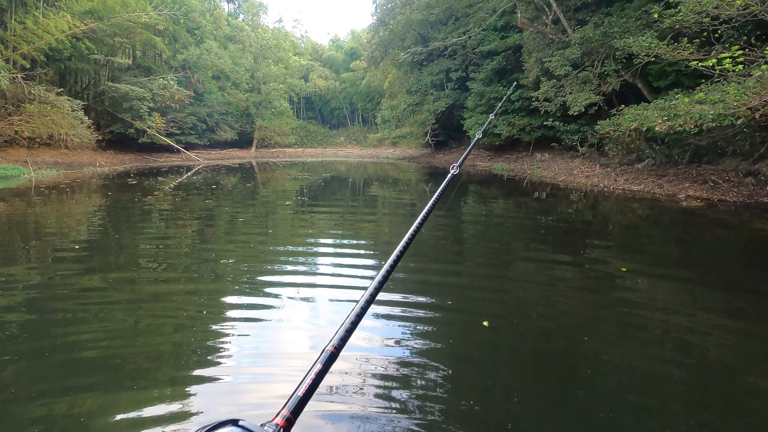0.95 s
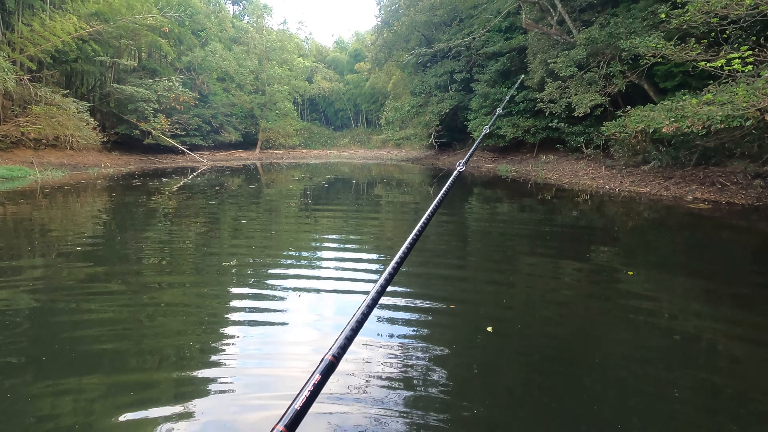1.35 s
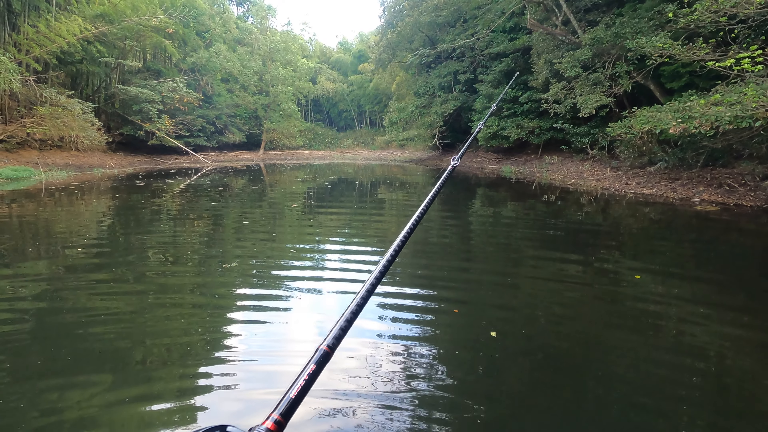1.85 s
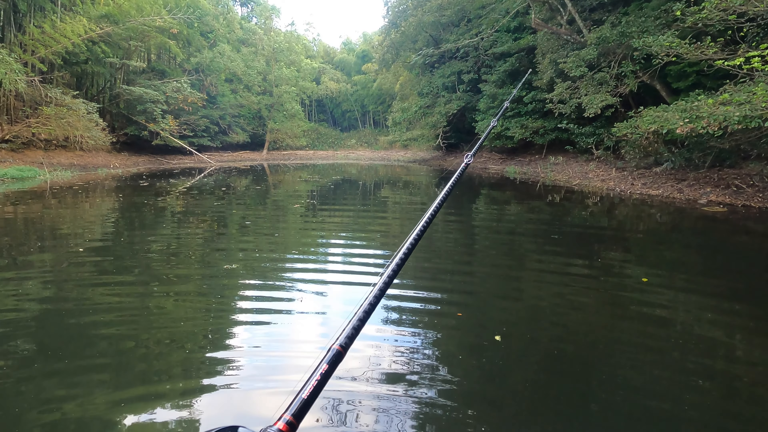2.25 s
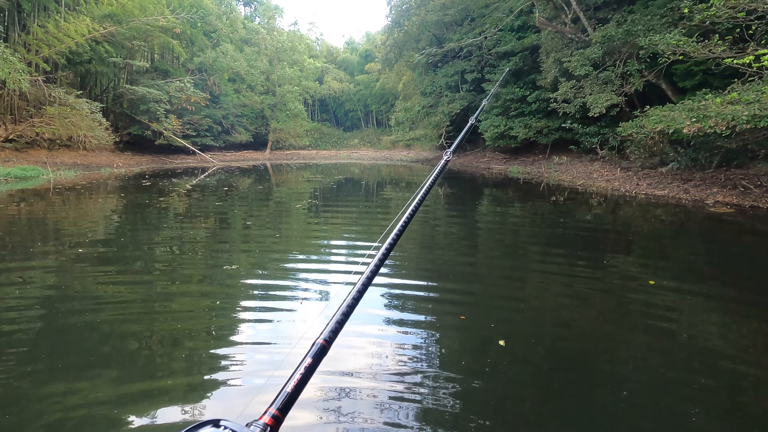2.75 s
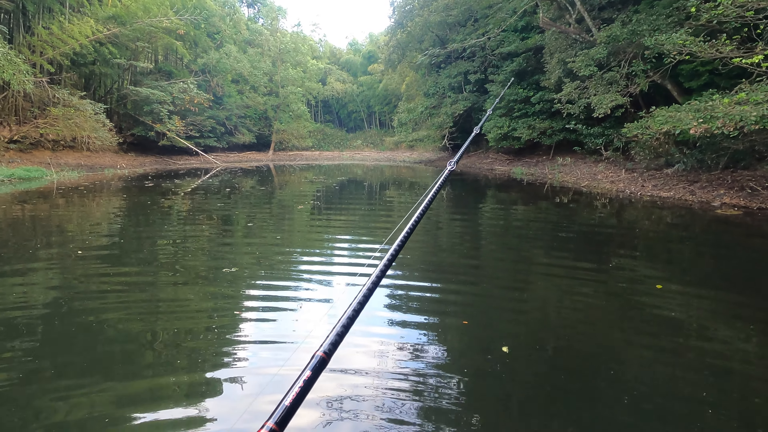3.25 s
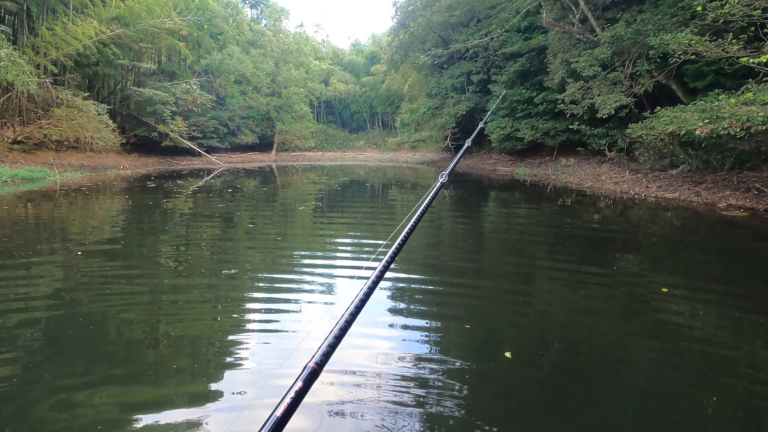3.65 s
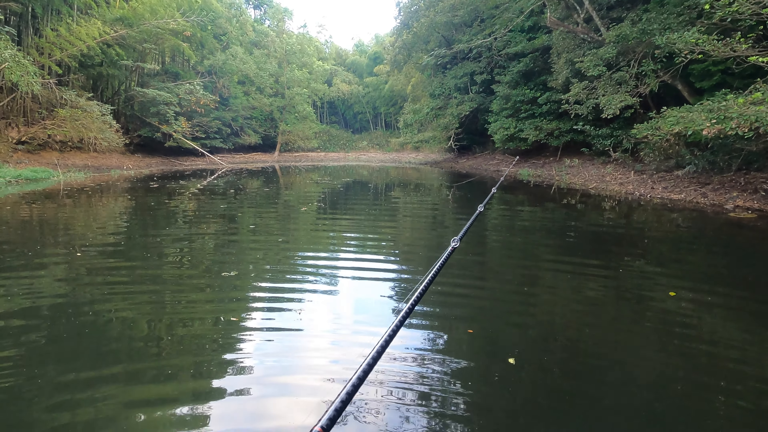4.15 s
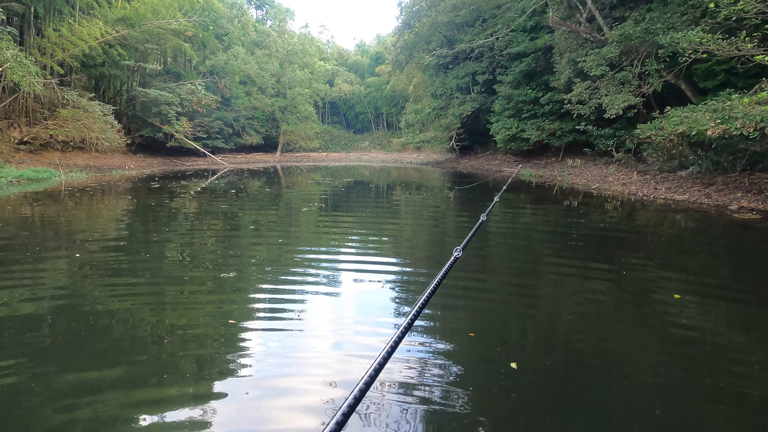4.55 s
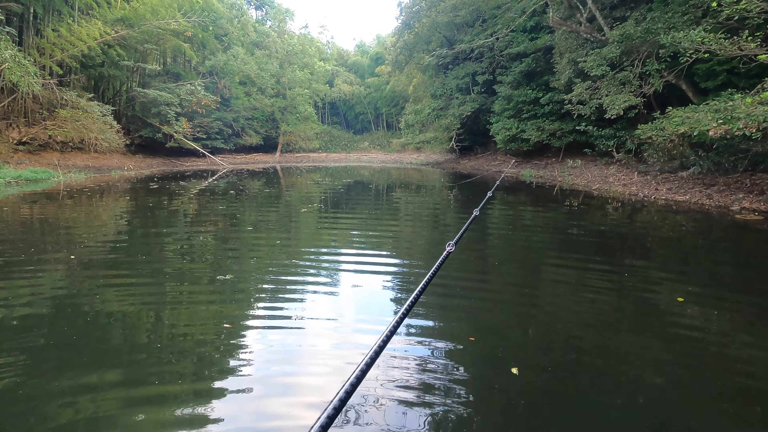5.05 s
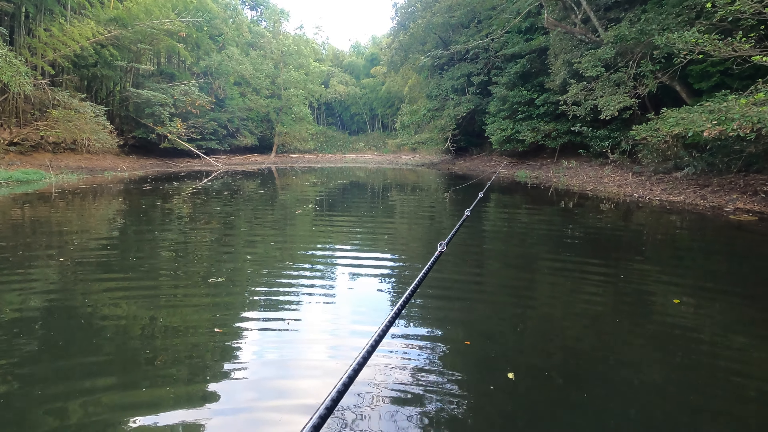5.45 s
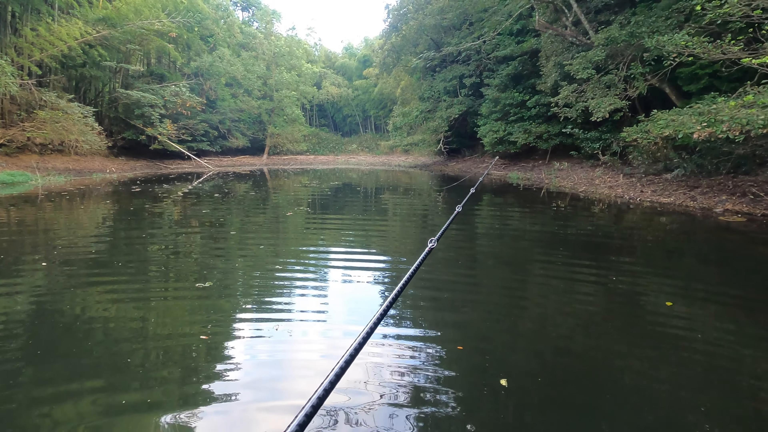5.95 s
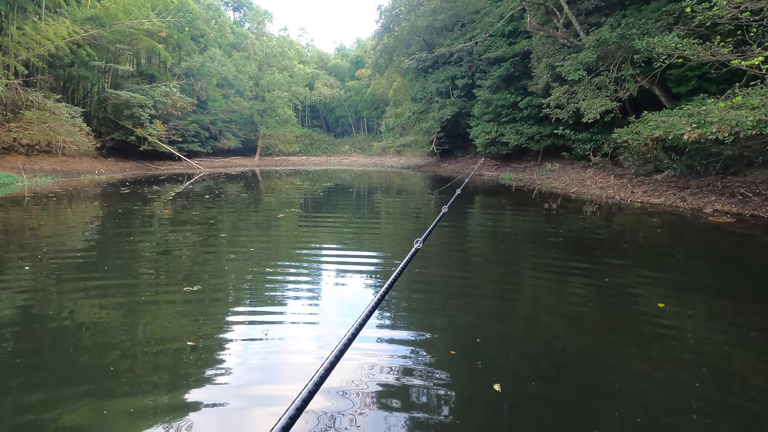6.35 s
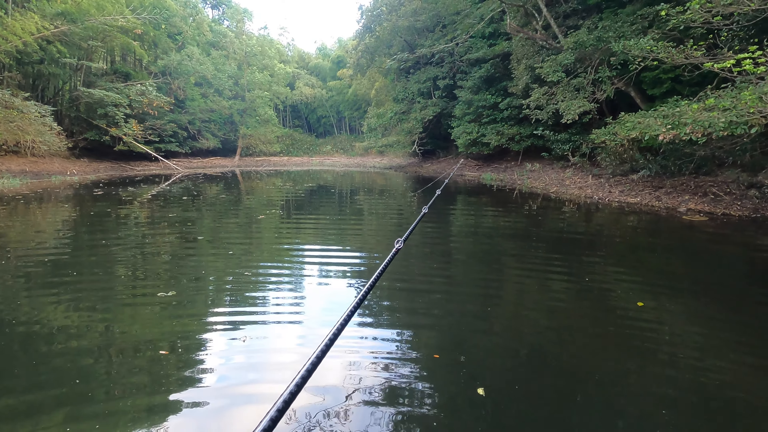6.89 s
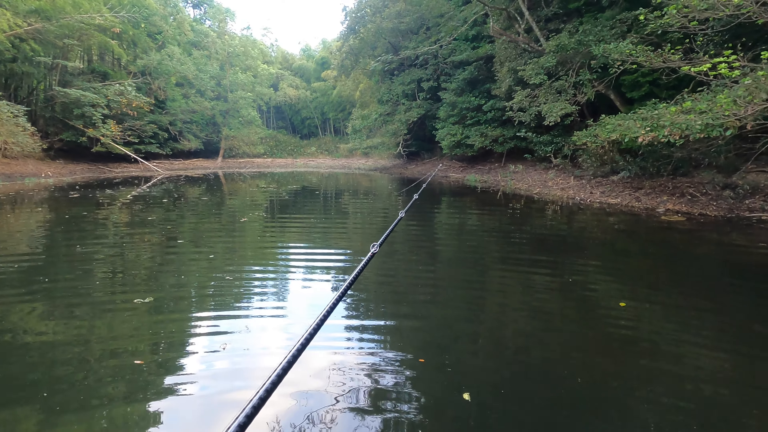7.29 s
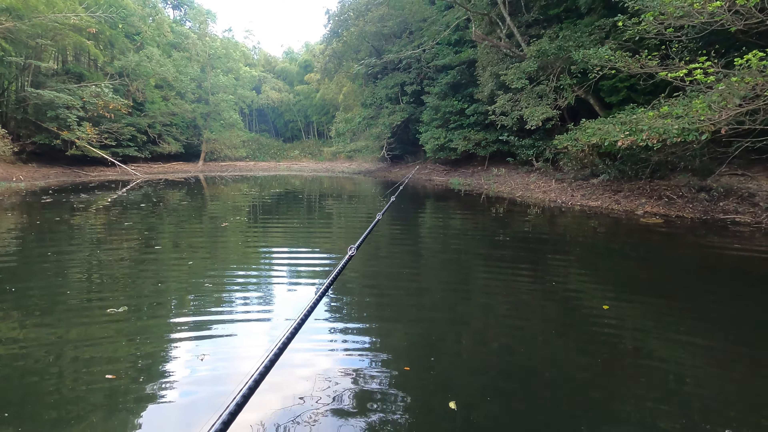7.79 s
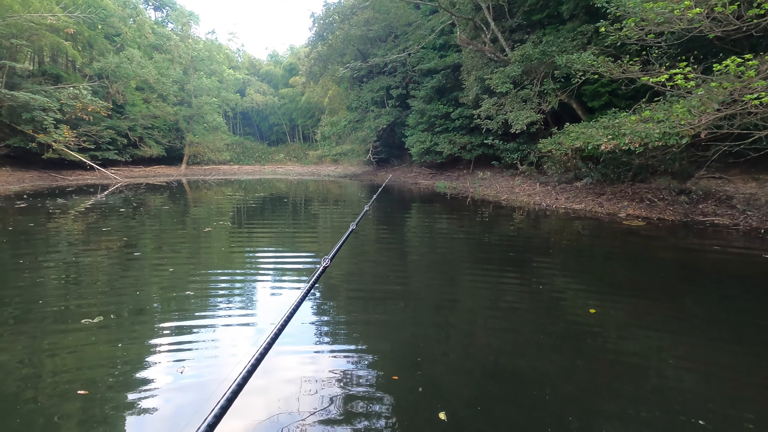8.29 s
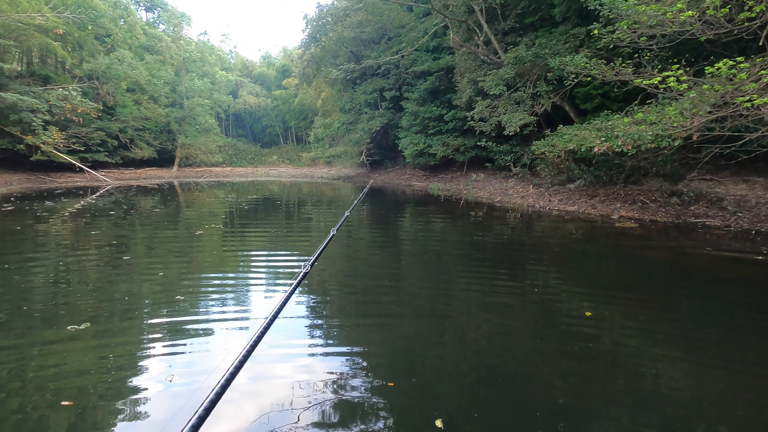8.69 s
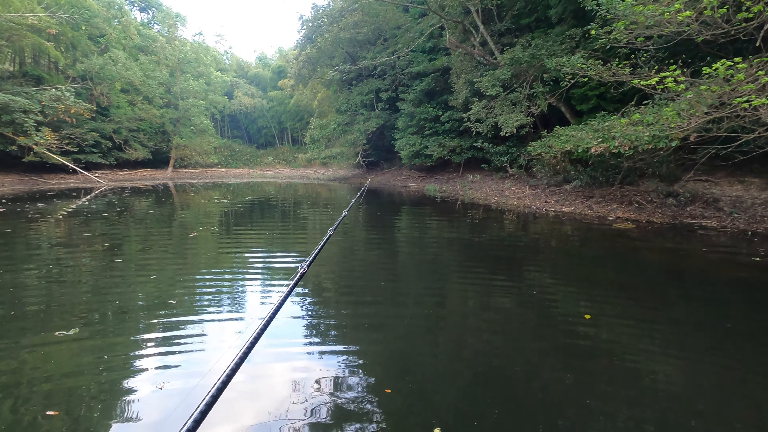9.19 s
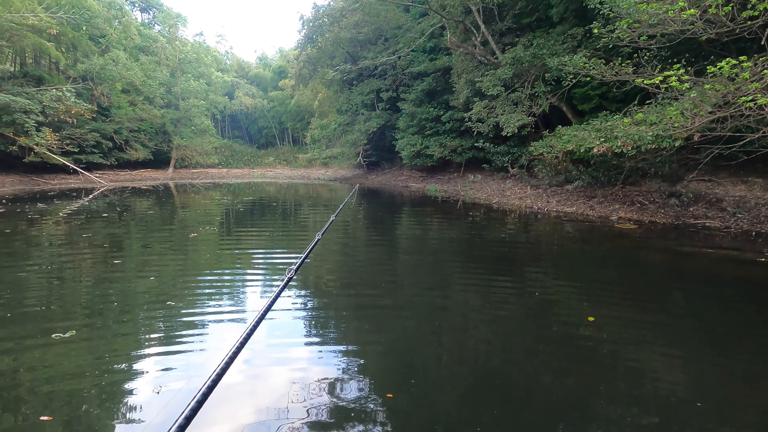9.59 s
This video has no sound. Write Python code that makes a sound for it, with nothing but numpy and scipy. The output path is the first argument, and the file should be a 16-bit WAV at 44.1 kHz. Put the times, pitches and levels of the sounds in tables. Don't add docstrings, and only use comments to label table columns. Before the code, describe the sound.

A still pond among trees, heard from a small boat with a near stereo microphone. A dry double metal snap dominates the opening; everything after is far softer. Fine gear ticks come unevenly, a lure lip clinks now and then, and a steady throbbing insect drone lies under echoing birdsong and nearer falling chips. From past the middle the seat creaks in quick slips and dull thuds bump the hull, with faint breeze rumble, before it calms again.

```python
import sys
import numpy as np
from scipy import signal
from scipy.fft import rfft, irfft
from scipy.io import wavfile
from scipy.ndimage import uniform_filter1d

SR = 44100
rng = np.random.default_rng(int(sys.argv[2]) if len(sys.argv) > 2 else 0)


def to_linear_factor(level_db):
    exponent = np.asarray(level_db, float) / 20
    return 10 ** exponent


def wav_record(signal):
    frames = np.transpose(np.atleast_2d(signal))
    bounded = np.clip(frames, -1, 1)
    quanta = np.round(bounded * 32767).astype(np.int16)
    wavfile.write(sys.argv[1], SR, quanta)


N = 433503
T = np.arange(N) / SR

# (time [s], peak [dB], centre [Hz], t60 [s])
CLUTCH_SNAPS = [(.2035, -46, 3000, .01), (.2225, -31, 4000, .012), (.2238, -13.5, 5500, .009),
                (.2272, -28, 4800, .014), (.231, -27, 5500, .009), (.2322, -11.5, 6300, .01),
                (.2372, -26, 4500, .012), (.2388, -3, 5200, .007), (.24, -5, 5600, .008),
                (.2414, -15, 5200, .008), (.2435, -18, 5000, .01), (.2465, -30, 4000, .02)]
# (frequency [Hz], level [dB], t60 [s])
HOUSING_MODES = [(650, -20, .02), (945, -34, .15), (1010, -22, .04), (1147, -16, .045), (1290, -7, .016),
                 (818, -36, .13), (1590, -14, .02), (1950, -6, .011), (2160, -19, .04), (2450, 0, .012),
                 (500, -24, .025), (4650, 4, .008), (5800, 9, .008), (6700, 7, .008), (7800, -6, .006)]
# (time [s], peak [dB], centre [Hz])
HANDLE_KNOCKS = [(.012, -46.5, 2800), (0.045, -55, 7000), (0.066, -40.5, 4440), (0.167, -42, 3780),
                 (.521, -55, 3030), (0.6025, -37.5, 5070), (0.604, -42.5, 1100), (0.833, -48, 4960),
                 (.908, -58, 6960), (1.2662, -52.5, 2826), (1.447, -55, 5500), (1.786, -55, 1779),
                 (8.351, -53, 5500), (2.201, -50.5, 2400), (2.756, -52, 2540), (3.17, -55, 4000),
                 (4.158, -52, 4960), (5.249, -46.5, 4500), (5.449, -45, 5000), (6.397, -50.5, 4970),
                 (8.766, -46, 4500), (9.074, -59, 4800)]
# (time [s], bright ring peak [dB], dull ring re bright [dB])
GEAR_TICKS = [(1.267, -56, 12), (2.2521, -53.5, 3), (2.4416, -52, -5), (2.4972, -42, -5.5),
              (2.543, -48, -13), (2.755, -48.5, -5), (2.8694, -54.5, -7.5), (2.9098, -52, -13),
              (3.163, -54, -9.5), (3.2626, -51.5, -16), (3.8737, -59, -12), (4.0423, -41, -1),
              (4.1588, -44.5, -3), (4.5854, -56.5, -6), (4.6225, -54, -9.5), (5.0473, -51.5, -8),
              (5.0798, -47, -5), (5.2024, -48.5, -2), (5.356, -48, -1), (5.385, -46, 7), (5.402, -52, 2),
              (5.807, -51, 4.5), (6.869, -56.5, 11.5), (7.4743, -59, 1), (8.351, -44, 1.5),
              (8.686, -55.5, -24), (9.127, -56, -7.5), (9.728, -48, -18)]
# (time [s], bright ring peak [dB], dull ring re bright [dB])
GUIDE_TICKS = [(1.227, -59, 10), (1.3616, -49.5, -1), (1.7804, -59, 1.5), (2.8957, -60, -6),
               (2.946, -56, -8), (3.217, -59, -15), (4.2531, -56, -9), (4.3703, -52.5, -13),
               (6.275, -56, -2), (6.691, -53.5, -6), (7.3112, -63, 7), (7.6155, -59, -1), (7.784, -56, 0),
               (7.982, -51, -5), (8.055, -52, 3), (8.449, -53.5, 0.5), (8.5557, -48.5, -3),
               (8.765, -53, -12), (8.837, -55, -3), (8.958, -56, -17), (9.427, -53, -3),
               (9.551, -57, -13.5), (9.5896, -57, -18)]
# (time [s], peak [dB])
FAINT_TICKS = [(.586, -72), (.652, -67), (1.0814, -64), (1.29, -66), (1.526, -67), (1.5994, -76),
               (1.7104, -70), (1.723, -69), (1.7864, -68.5), (2.107, -63), (2.3024, -69), (2.5804, -65),
               (2.613, -62), (2.9274, -64), (3.4506, -66), (3.474, -61), (3.8417, -67.5), (3.903, -61),
               (3.983, -69), (4.0637, -61), (4.2324, -70), (4.6944, -67), (4.849, -57), (5.0854, -62),
               (5.1764, -72), (5.1886, -68), (5.334, -57), (5.503, -61), (5.7813, -65.5), (6.009, -68),
               (6.3374, -66), (6.4144, -68), (6.475, -63), (6.523, -64), (6.668, -64), (7.0634, -67.5),
               (7.2684, -69.5), (7.3228, -60.5), (7.5358, -64), (7.6755, -65), (7.7388, -66), (7.9583, -71),
               (8.3396, -65), (8.54, -58.5), (8.9914, -64), (9.112, -68), (9.1864, -74), (9.2025, -62),
               (9.366, -64), (9.5766, -64), (9.6794, -68), (9.7512, -61.5)]
# (frequency [Hz], lead [rad])
PORT_LEAD = [(400, 0), (950, .6), (2300, 1), (4500, .15), (8700, .6), (9500, -.6), (11500, .2),
             (13000, 1.2)]
# (time [s], peak [dB], frequency [Hz])
LURE_CLINKS = [(1.5968, -53.5, 2040), (2.5531, -55.5, 1950), (2.6055, -59, 1960), (2.6497, -42, 2036),
               (3.214, -49, 2170), (4.0442, -57, 1720), (4.316, -47, 2370), (4.64, -54, 2640),
               (5.8587, -44, 2210), (6.5171, -54, 2300), (6.9858, -53.5, 2330), (7.0404, -52, 2150),
               (7.3888, -44.5, 2010), (8.7375, -62, 1610), (9.245, -43, 2040)]
# (time [s], peak [dB], frequency [Hz])
HULL_THUDS = [(0.24, -44.5, 163), (3.163, -57, 178), (3.92, -40, 148), (5.714, -47, 168), (5.906, -40, 191),
              (6.589, -33.5, 209), (6.641, -38, 190), (6.966, -35.5, 191), (7.018, -38.5, 180),
              (7.087, -38.5, 182), (7.488, -47.5, 207), (7.518, -49, 238), (7.558, -46, 210),
              (7.597, -35, 202), (7.657, -47.5, 202), (7.915, -46, 197), (8.006, -43.5, 172),
              (8.078, -40.5, 176)]
# (time [s], peak [dB])
SEAT_SLIPS = [(5.687, -55), (5.719, -49), (5.738, -52), (5.755, -49), (5.799, -49), (5.838, -54),
              (5.873, -44.5), (5.893, -45.5), (5.929, -48.5), (5.949, -53), (6.008, -59), (6.046, -52.5),
              (6.135, -53), (6.416, -45), (6.441, -46.5), (6.468, -46.5), (6.495, -51.5), (6.517, -45),
              (6.535, -46), (6.774, -52.5), (6.891, -52.5), (6.931, -54.5)]
# (length [s], start [Hz], bend [Hz], end [Hz], level re full note [dB])
SONG_NOTES = [
    (.12, 8180, 8300, 8300, -19),
    (.07, 7100, 7640, 7220, -11),
]
# (thin note time [s], hooked note time [s], level [dB])
SONGS = [
    (.463, .625, -63),
    (.95, 1.14, -63),
    (2.054, 2.21, -60),
    (3.913, 4.06, -58.5),
    (5.41, 5.538, -59.5),
    (7.45, 7.575, -62),
]
# (time [s], level [dB])
THIN_NOTES = [
    (.01, -77.5),
    (7.882, -76),
    (8.374, -78),
    (9.76, -75.5),
]
# (time [s], climb [s], start [Hz], top [Hz], held [Hz], climb [dB], hold [dB])
FULL_NOTES = [
    (.724, .036, 4900, 5950, 5430, -63, -63),
    (1.25, .026, 5050, 5950, 5350, -64, -66),
    (2.328, .048, 5580, 6020, 5660, -59, -67),
    (4.186, .036, 5300, 5820, 5360, -57, -67),
    (5.668, .03, 5170, 5580, 5200, -58, -65),
    (7.696, .04, 5280, 5900, 5420, -61, -62),
]
# (time [s], length [s], start [Hz], held [Hz], level [dB])
SLURRED_CALLS = [
    (5.459, 0.0724, 4150, 3950, -53.5),
    (5.56, .085, 3950, 4030, -58.5),
    (5.804, 0.12, 6900, 6900, -64),
    (5.926, .1, 1297, 1285, -62),
    (5.945, .078, 5550, 5570, -66),
    (8.16, 0.09, 5460, 5450, -57),
    (8.764, 0.021, 9000, 8550, -69),
]
# (time [s], length [s], start [Hz], middle [Hz],
# end [Hz], level [dB])
BENT_CALLS = [(6.515, .07, 5150, 5180, 5100, -60), (6.6, .12, 5000, 5130, 5100, -66),
              (6.492, .07, 5150, 4600, 4300, -59), (6.53, .054, 2620, 2400, 2350, -67),
              (8.222, .11, 4200, 4450, 4750, -61), (8.296, .02, 4000, 3400, 2600, -67),
              (8.324, .16, 2400, 2390, 2391, -71), (5.49, .12, 3800, 3310, 2950, -68),
              (8.045, .02, 6940, 7200, 7400, -62), (8.07, .05, 7050, 7600, 6700, -62),
              (1.118, .06, 7150, 6950, 7150, -66), (5.9, .12, 2400, 4020, 4640, -67)]
# (time [s], length [s], start [Hz], end [Hz], level [dB])
SLIDES = [
    (6.416, .084, 3250, 5220, -59),
    (6.42, .025, 3250, 2650, -63),
    (6.648, .04, 3450, 2400, -60),
    (5.422, .022, 1900, 5300, -64),
    (2.603, .014, 2950, 3500, -61),
    (3.16, .025, 4300, 3500, -61),
    (6.73, .03, 4600, 5900, -67),
]
# (time [s], length [s], low edge [Hz], high edge [Hz], level [dB])
RASPS = [(0.135, 0.085, 6800, 7700, -67), (0.551, 1.32, 746, 943, -75), (5.439, 0.37, 2780, 4400, -63),
         (5.429, 0.59, 4840, 7140, -67.5), (5.851, 0.33, 3340, 5200, -61.5), (5.859, 2.15, 1201, 1310, -72),
         (6.201, 0.25, 5450, 6920, -72), (6.461, 0.27, 3450, 5000, -62.5), (6.499, 0.55, 1980, 3350, -73),
         (6.721, 0.25, 4800, 7200, -69.5), (7.456, 2.4, 1127, 1333, -74.5), (8.191, 0.51, 3480, 4830, -63)]
# (time [s], peak [dB], start [Hz])
CHIPS = [(0.146, -63, 3800), (0.972, -67, 3700), (1.044, -59, 4000), (1.603, -65.5, 3600),
         (1.6894, -59, 3790), (2.045, -60, 3770), (2.588, -58.5, 3600), (2.664, -53.5, 3950),
         (4.376, -58, 3500), (4.433, -50.5, 4200), (4.597, -55.5, 3950), (4.771, -55.5, 3850),
         (5.1377, -65, 3800), (6.728, -57, 4000), (7.3597, -60, 3800), (7.598, -63, 3450),
         (7.757, -59, 3460), (7.885, -57, 3800), (9.288, -62, 3340), (9.7956, -58, 3840)]
# (centre [Hz], width [Hz], level [dB], throb rate [Hz], throb depth [dB])
INSECT_CHOIRS = [
    (4500, 300, -68.5, 15.8, 3),
    (4120, 730, -66.5, 32, 0),
    (6100, 1500, -75, 7.4, 1.5),
    (1192, 560, -71.5, 4.5, 1.5),
]
# (frequency [Hz], density [dB/Hz])
WOOD_SPECTRUM = [(90, -6), (110, -16), (175, -0.5), (260, -9.5), (500, -19), (800, -24.5), (2000, -20),
                 (3200, -26), (5000, -27.5), (7500, -29.5), (9000, -40), (12000, -52), (14000, -76)]
# (time [s], half length [s], breeze lift [dB], murmur lift [dB])
STIRS = [(0.3, 0.36, 5.5, -1), (1.258, 0.17, 2, -3.5), (1.827, 0.36, 3.5, -3.5), (3.31, .3, -6, 2),
         (3.718, 0.16, 7.5, 1.5), (3.97, 0.29, 0, 8.5), (5.45, 0.19, 6, 0), (5.828, 0.42, 7, 9),
         (6.614, 0.23, 15, 13.5), (7.027, 0.19, 23.5, 14), (7.502, 0.35, -0.5, 5.5), (8.042, 0.18, 25, 11),
         (9.677, 0.3, 13.5, 1.5)]


def reel():
    gear_pan_db, guide_pan_db = 2.5, -2.5
    faint_gain_db = 5
    snap, ticks = np.zeros((2, 2, N))
    for s, db, hz, t60_s in CLUTCH_SNAPS:
        add(snap, s, to_linear_factor(db - 2.5) * crack(hz, t60_s, .75), .5)
        add(snap, s, to_linear_factor(db - 4) * ring(HOUSING_MODES, .00054), 1.5)
    for s, db, hz in HANDLE_KNOCKS:
        add(ticks, s, to_linear_factor(db) * crack(hz, .033, .44), 2.1)
        add(ticks, s, to_linear_factor(db - 12) * ring(HOUSING_MODES[:4], .00085), 2.1)
    leans = rng.standard_normal(len(FAINT_TICKS))
    for (s, db), lean in zip(FAINT_TICKS, leans):
        add(ticks, s, to_linear_factor(db + faint_gain_db) * crack(11400, .0097, .82), 3 * lean)
    for table, pan_db in [(GEAR_TICKS, gear_pan_db), (GUIDE_TICKS, guide_pan_db)]:
        for s, db, dull_db in table:
            modes = [(5220, dull_db - 18, .0074), (5930, dull_db - 13, .0054), (7200, dull_db, .0019),
                     (8780, -15, .0052), (9900, -7, .0016), (11830, -14.5, .0017), (14000, -35, .0049)]
            add(ticks, s, to_linear_factor(db + max(dull_db, 0) + 5.5) * ring(modes, .00019), pan_db)
    shade = butter(snap[0], 1, [1500, 3500]) + butter(snap[0], 1, [7000, 7900])
    snap = snap + .15 * shade * np.array([[1], [-1]])
    snap = to_linear_factor(-3) * butter(snap, 2, [8600, 11000], "bandstop") + .2 * snap
    to_banks = butter(snap, 1, [4500, 14000])
    scatter = echo(to_banks, .72, .045)
    late_return = np.roll(echo(to_banks, .08, .012), 2200, axis=1)
    return ports(snap + ticks) + to_linear_factor(-29.5) * (.8 * scatter + .52 * late_return)


def lure():
    out = np.zeros((2, N))
    for s, db, hz in LURE_CLINKS:
        t60_s = .06 if hz < 2100 else .035
        modes = [(hz, 0, t60_s), (1.047 * hz, -6, .02), (.64 * hz, -9, .012), (.73 * hz, -12, .01)]
        add(out, s, to_linear_factor(db) * ring(modes, .0004), 2, lag_samples=3)
        add(out, s, to_linear_factor(max(db, -52) - 3.5) * crack(1860, .012, .56), 2)
    return out


def boat():
    thud_pan_db, seat_hz, seat_spread = 7.5, 406, .051
    out = np.zeros((2, N))
    t = T[:int(.06 * SR)]
    sway = -np.sin(2 * np.pi * 40 * t) * np.hanning(len(t))
    for s, db, hz in HULL_THUDS:
        swing = np.sin(2 * np.pi * hz * t) * (t * hz) ** 2 * np.exp(-3.2 * t * hz)
        thud = swing / np.abs(swing).max() + .21 * sway
        add(out, s + .0055, to_linear_factor(db) * thud, thud_pan_db)
        add(out, s + .0084, to_linear_factor(db - 13.5) * crack(1100, .037, .94), 5)
    slip_hz = seat_hz * (1 + seat_spread * rng.standard_normal(len(SEAT_SLIPS)))
    for (s, db), hz in zip(SEAT_SLIPS, slip_hz):
        modes = [(hz, 0, .035), (1.2 * hz, -4, .03), (830, -11, .025),
                 (1150, -12, .02), (1800, -15, .015), (2400, -22, .015)]
        add(out, s, to_linear_factor(db) * ring(modes, .00089), 6.5, lag_samples=3)
        add(out, s, to_linear_factor(db - 2) * crack(1200, .033, 1), 5)
    return out


def birds():
    hold_s, overshoot = .11, .03
    chip_s, chip_end_hz = .036, 2740
    wood_t60_s = .5
    far, near = np.zeros((2, 2, N))
    notes = []  # (time [s], length [s], start [Hz], bend [Hz], end [Hz], level [dB])
    for *starts, db in SONGS:
        for s, note in zip(starts, SONG_NOTES):
            notes.append((s, *note[:4], db + note[4]))
    for s, climb_s, hz0, top, held, db, hold_db in FULL_NOTES:
        notes.append((s, climb_s, hz0, (2 * hz0 + top) / 3, top, db))
        notes.append((s + climb_s, hold_s, (top + 2 * held) / 3, held, held, hold_db))
    for s, length_s, hz0, hz1, db in SLIDES:
        notes.append((s, length_s, hz0, (2 * hz0 + hz1) / 3, hz1, db))
    for s, db in THIN_NOTES:
        notes.append((s, *SONG_NOTES[0][:4], db))
    for s, length_s, hz0, hz, db in SLURRED_CALLS:
        notes.append((s, length_s, hz0, hz * (1 + overshoot * np.sign(hz - hz0)), hz, db))
    for s, length_s, hz0, hz1, hz2, db in notes + BENT_CALLS:
        quaver = min(.22, (150 if hz1 > 6500 else 80) / (abs(hz1 - hz2) + 250))
        settle = .95 if (hz1 - hz0) * (hz2 - hz1) > 0 else .6
        add(far, s - .006, to_linear_factor(db) * whistle(length_s, hz0, hz1, hz2, -40, quaver, settle), 2)
    for s, length_s, lo_hz, hi_hz, db in RASPS:
        u = np.arange(int(length_s * SR)) / (length_s * SR)
        rasp = butter(rng.standard_normal(len(u)), 3, [lo_hz, hi_hz])
        add(far, s, to_linear_factor(db) * unit(rasp) * np.minimum(5 * u, 1) * (1 - u) ** .47, 2)
    for s, db, hz in CHIPS:
        bend_hz = .72 * hz + .28 * chip_end_hz
        chip = whistle(chip_s, hz, bend_hz, chip_end_hz, -13.5, .09, .93)
        add(near, s - .01, to_linear_factor(db) * chip * np.linspace(1, .35, len(chip)), 1)
    rising_chip = whistle(.04, 2800, 3500, 4300, -30, .03)[:1200] * np.hanning(1200) ** .4
    add(near, 5.174, to_linear_factor(-56) * rising_chip, 1)
    direct = to_linear_factor(-.5) * far * to_linear_factor(3 * walk(60)) + near * to_linear_factor(4.5 * walk(150))
    return direct + to_linear_factor(-3) * echo(near, .25, .012) + to_linear_factor(2.2) * echo(far, wood_t60_s, .01)


def insects():
    out = 0
    for hz, width_hz, db, rate_hz, throb_db in INSECT_CHOIRS:
        throb = np.sin(2 * np.pi * np.cumsum(rate_hz * (1 + .045 * walk(2))) / SR)
        level_db = db + throb_db * throb + .49 * walk(.74) + 1.1 * walk(9.7)
        out = out + to_linear_factor(level_db) * spread(band(hz, width_hz), -10 if hz > 3000 else -5)
    return out


def wood():
    wood_db, breeze_db = -63.5, -69
    breeze_lift_db, murmur_db = sum(np.outer(lift_db, np.maximum(1 - abs(T - s) / half_s, 0))
                                    for s, half_s, *lift_db in STIRS)
    spectrum_hz, spectrum_db = np.transpose(WOOD_SPECTRUM)
    out = 0
    for hz in 110 * 2 ** np.arange(0, 7.2, 1 / 3):
        db = np.interp(np.log(hz), np.log(spectrum_hz), spectrum_db) + 10 * np.log10(hz / 175)
        flicker_db = (2.5 if hz < 400 else 1.4) * walk(9)
        lean = to_linear_factor(np.array([[1], [-1]]) * 2 / (1 + (np.log(hz / 350) / .9) ** 2))
        level = to_linear_factor(db + murmur_db / (1 + (hz / 400) ** 2) + flicker_db)
        out = out + level * lean * spread(band(hz, hz / 4), -4.5, 3 * (400 < hz < 3300))
    puffs = band(34, 50) + to_linear_factor(-11.5 + 3 * walk(6.9)) * band(70, 50)
    breeze_level = to_linear_factor(breeze_db + breeze_lift_db + 3.16 * walk(10) + 2.2 * walk(4))
    breeze = breeze_level * spread(puffs, -7.5) * to_linear_factor(np.array([[-1], [1]]))
    return to_linear_factor(wood_db - 4) * out + breeze


def crack(hz, t60_s, width):
    t = T[:512]
    f = np.arange(257) * SR / 512 + 1
    x = rng.standard_normal(512) * np.exp(-np.log(1000) * t / t60_s) * (1 - np.exp(-t / .000068))
    colour = np.exp(-(np.log(f / hz) / width) ** 2) / (1 + (f / 9500) ** 16) ** .5 + .005
    x = np.roll(irfft(rfft(x) * colour), 12) * np.hanning(1024)[512:]
    return x / np.abs(x).max()


def ring(modes, push_s):
    hz, db, t60_s = np.transpose(modes)[:, :, None]
    t = T[:int(t60_s.max() * SR)]
    chance = rng.random((len(modes), 2))
    detune = .9827 + .016 * chance[:, :1]
    x = to_linear_factor(db) * np.exp(-np.log(1000) * t / t60_s) * np.sin(2 * np.pi * (hz * detune * t + chance[:, 1:]))
    x = x.sum(axis=0) * (1 - np.exp(-t / push_s))
    return x / np.abs(x).max()


def whistle(length_s, hz0, hz1, hz2, overtone_db, quaver, settle=.6):
    u = np.arange(int(length_s * SR)) / (length_s * SR)
    hz = np.interp(u, [0, .33, min(settle, .99), 1], [hz0, hz1, hz2, hz2])
    hz = uniform_filter1d(hz, len(u) // 12 + 1)
    shake = np.interp(u, np.linspace(0, 1, 24), rng.standard_normal(24))
    phase = 2 * np.pi * np.cumsum(hz + quaver * (abs(hz1 - hz2) + 250) * shake) / SR
    fade = (1 - u) ** (.32 if settle < .9 or hz2 < hz0 else .06)
    return np.minimum(6 * u, 1) * fade * (np.sin(phase) + to_linear_factor(overtone_db) * np.sin(2 * phase))


def echo(x, t60_s, gap_s):
    t = T[:int(t60_s * SR)]
    fade = np.exp(-np.log(1000) * t / t60_s) * (1 - np.exp(-(t / gap_s) ** 4))
    tail = rng.standard_normal((3, len(t))) * fade
    tail = tail[0] + .56 * tail[1:]
    return signal.fftconvolve(x, tail / np.sqrt(np.sum(tail[0] ** 2)), axes=1)[:, :N]


def ports(x):
    f = np.arange(N // 2 + 1) * SR / N + 1
    lead_hz, lead_rad = np.transpose(PORT_LEAD)
    lead = np.interp(np.log(f), np.log(lead_hz), lead_rad)
    return irfft(rfft(x) * np.exp(.5j * lead * np.array([[1], [-1]])), N)


def add(out, s, x, pan_db=0, lag_samples=0):
    start = int(s * SR)
    for side, (gain, i) in enumerate([(to_linear_factor(pan_db / 2), start), (to_linear_factor(-pan_db / 2), start + lag_samples)]):
        out[side, i:i + len(x)] += gain * x[:N - i]


def spread(pair, side_db, lag_samples=0):
    mid, side = pair[0], to_linear_factor(side_db) * pair[1]
    return np.array([mid + side, np.roll(mid - side, lag_samples)])


def band(hz, width_hz, channels=2):
    f = np.arange(N // 2 + 1) * SR / N
    spectrum = rfft(rng.standard_normal((channels, N)))
    return unit(irfft(spectrum / (1 + (2 * (f - hz) / width_hz) ** 2) / (1 + (f / 13200) ** 16), N))


def walk(rate_hz):
    k = int(SR / rate_hz)
    held = np.repeat(rng.standard_normal(N // k + 1), k)
    return 1.3 * uniform_filter1d(uniform_filter1d(held, k), k)[:N]


def unit(x):
    return x / np.sqrt(np.mean(x ** 2))


def butter(x, order, edges_hz, kind="bandpass"):
    return signal.sosfilt(signal.butter(order, edges_hz, kind, fs=SR, output="sos"), x)


def scene():
    return reel() + lure() + boat() + birds() + insects() + wood()


def band_limit(x):
    return signal.sosfilt(signal.butter(12, 15780, fs=SR, output="sos"), x)


def record(dry):
    no_top = signal.sosfilt(signal.ellip(8, .2, 70, 15700, fs=SR, output="sos"), dry)
    mix = butter(no_top, 2, 20, "highpass")
    return band_limit(mix)


dry = scene()
out = record(dry)
wav_record(out)
```